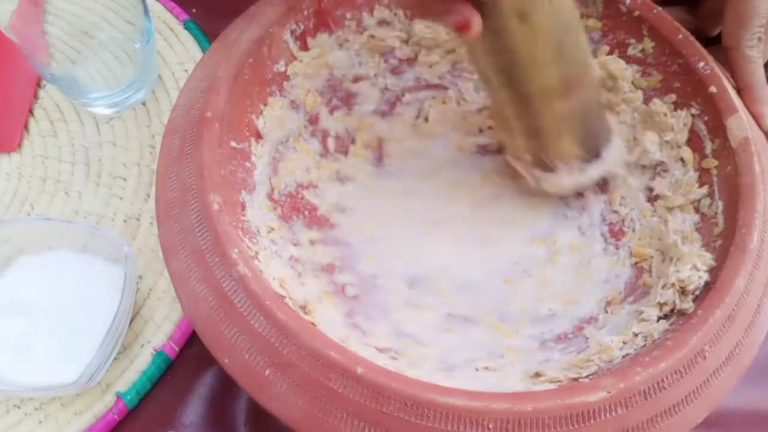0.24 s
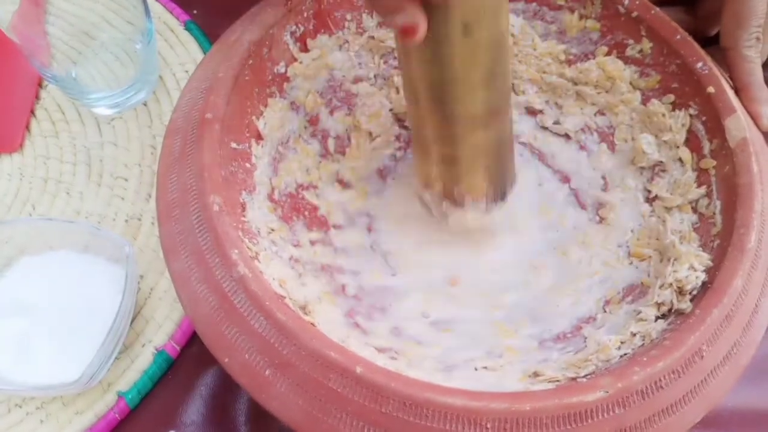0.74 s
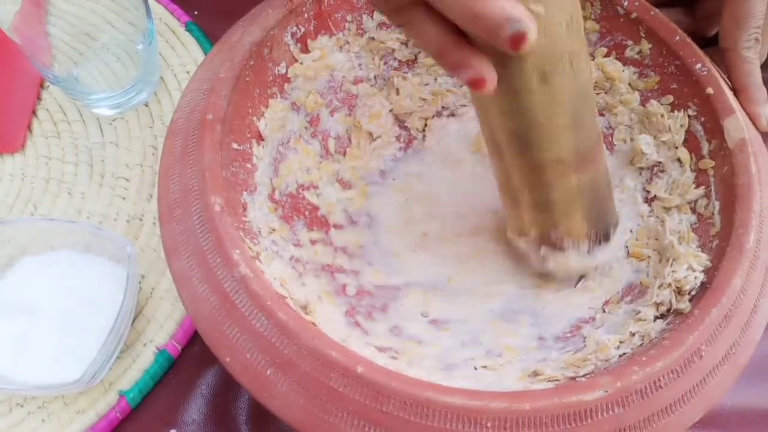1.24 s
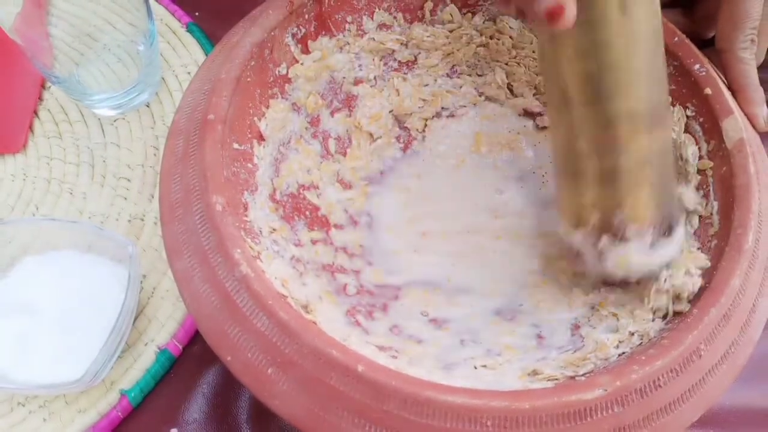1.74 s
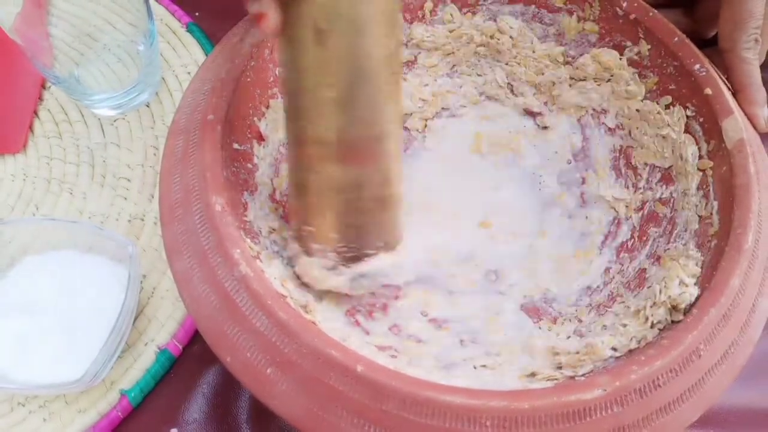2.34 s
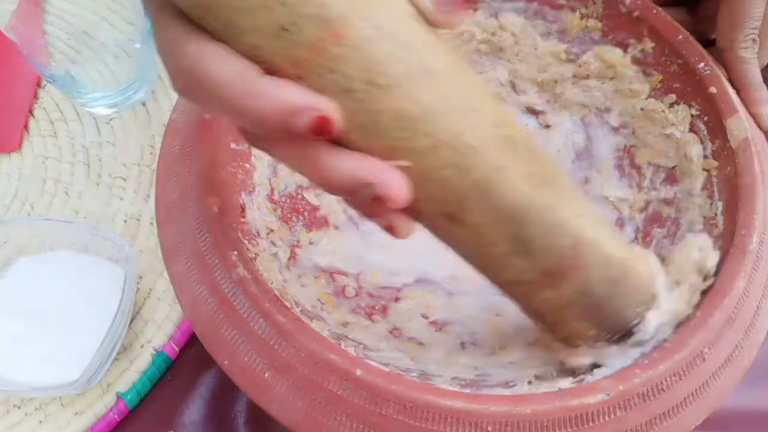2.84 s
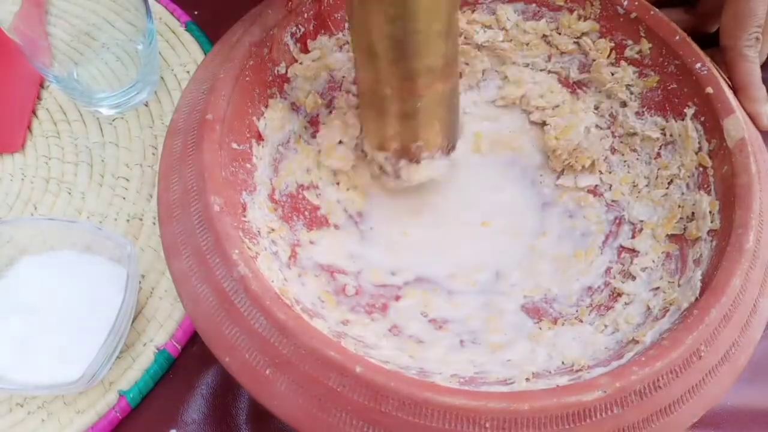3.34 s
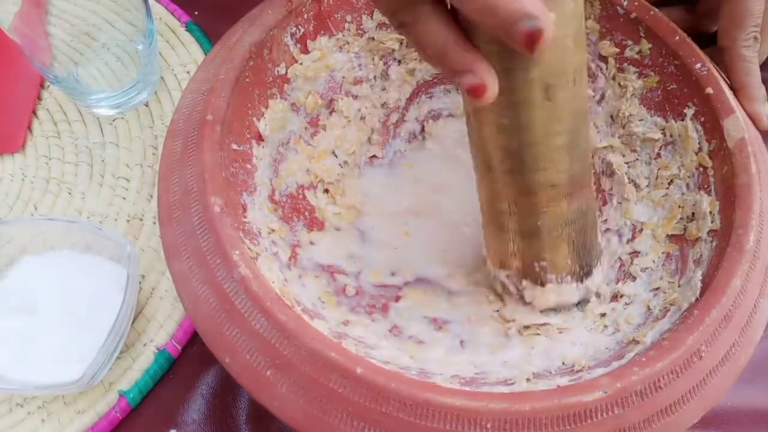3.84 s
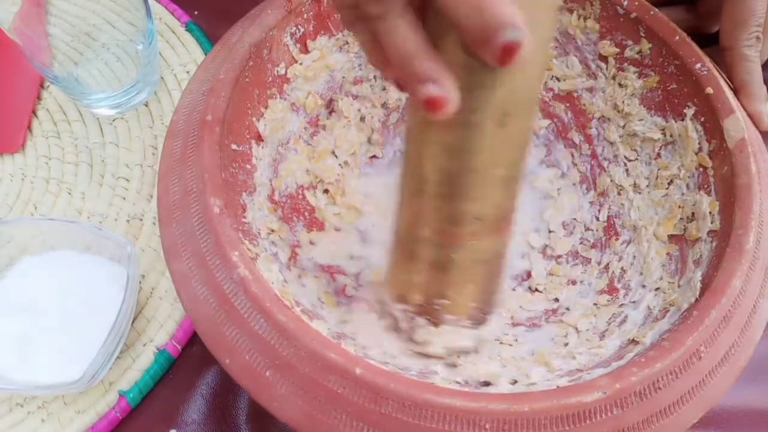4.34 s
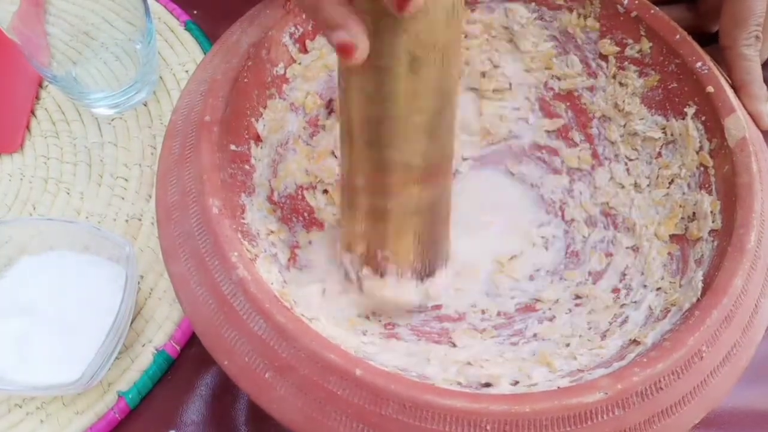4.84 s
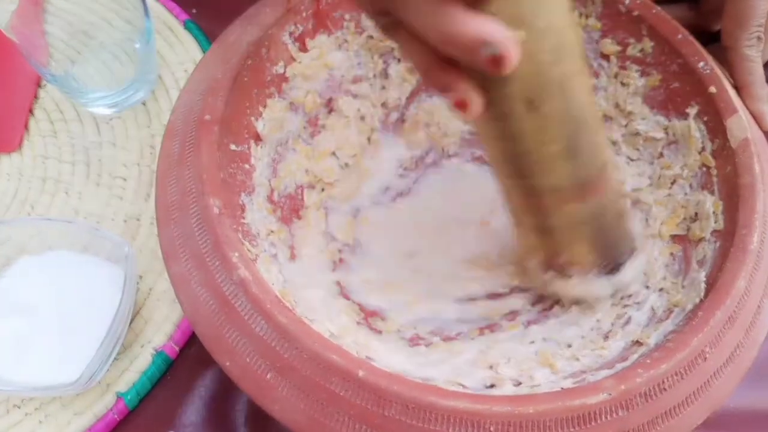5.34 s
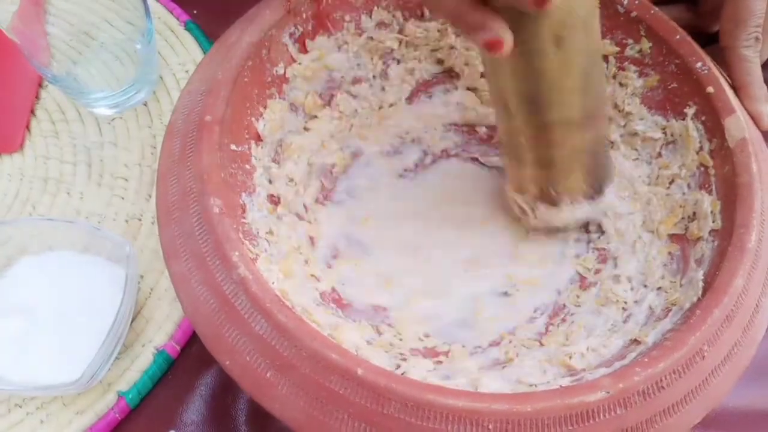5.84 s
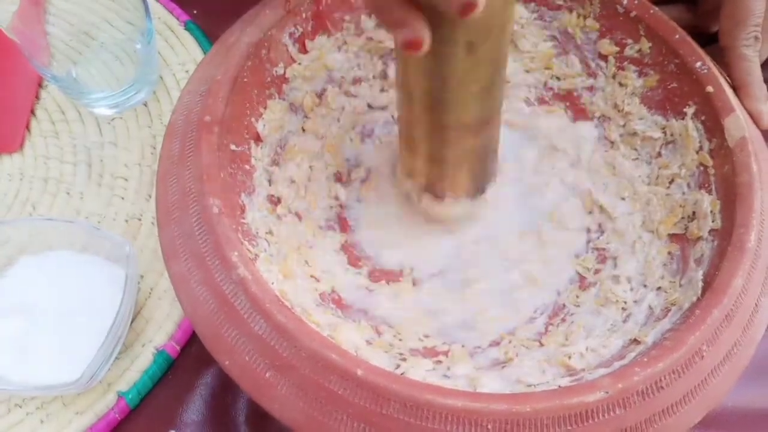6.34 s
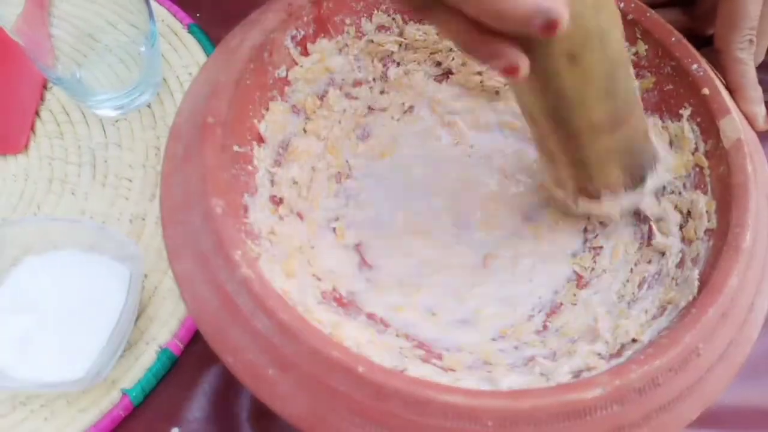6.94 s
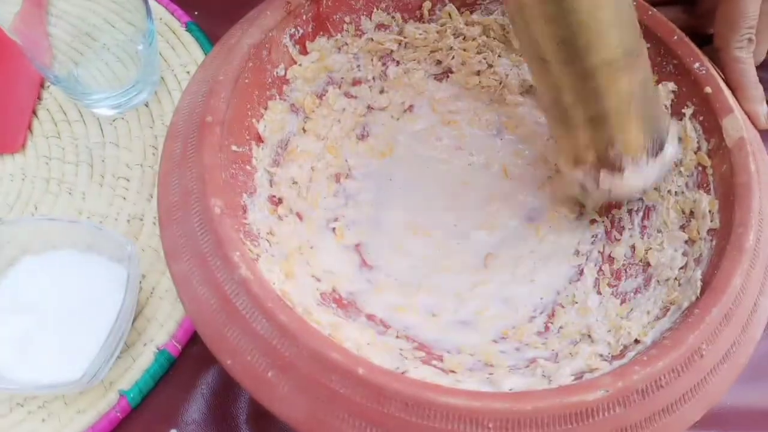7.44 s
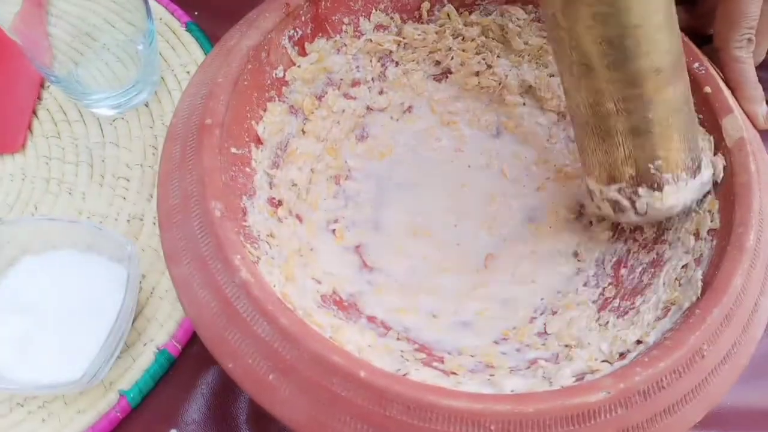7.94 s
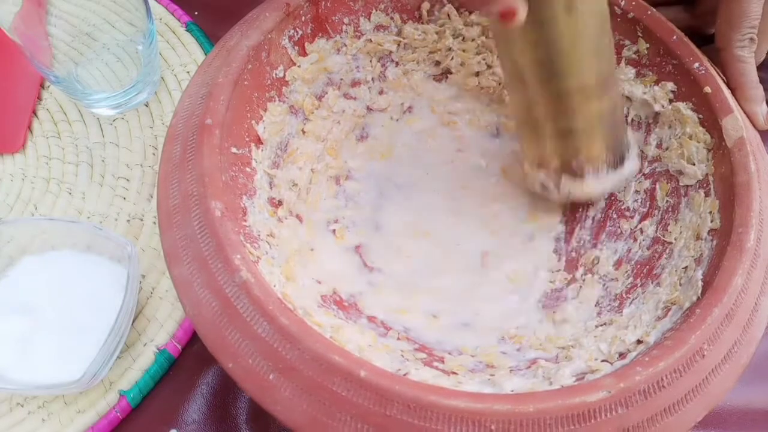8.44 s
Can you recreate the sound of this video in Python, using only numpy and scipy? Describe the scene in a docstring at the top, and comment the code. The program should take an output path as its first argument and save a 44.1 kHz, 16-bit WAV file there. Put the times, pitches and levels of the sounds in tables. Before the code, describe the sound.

Wet, grainy scraping in a clay bowl: brisk bright rasps with a faint hollow clay ring and soft table thuds, then a short lull of slower, smoother rubbing, then vigorous grinding again, crunchier and louder, with sharp seed cracks and a few solid pestle knocks. Mono, very close phone microphone, dry small kitchen with faint rumble.

```python
"""Pestle grinding wet seeds in a clay mortar

Quick strokes close to a phone in a quiet kitchen. Grit noise rasps and rings the wall, body, table and rim;
the rim rings on when the stroke runs up the wall. Bumps and knocks are soft pushes into body and table modes.
Seeds split as short filtered noise bursts, fragments crunch as decaying sine grains, sticky paste ticks faintly.
"""
import sys
import numpy as np
from scipy import signal
from scipy.fft import rfft, irfft, next_fast_len
from scipy.io import wavfile
from scipy.ndimage import uniform_filter1d, map_coordinates

SR = 44100
rng = np.random.default_rng(int(sys.argv[2]) if len(sys.argv) > 2 else 0)


def store_wav(level_fs):
    """Save 16-bit WAV to argv[1]."""
    pcm = np.round(np.clip(np.atleast_2d(level_fs), -1, 1) * 32767)
    wavfile.write(sys.argv[1], SR, pcm.T.astype(np.int16))


N = 382788

# pestle knocks: start_s, ring_peak_db, thud_db (table thud peak against ring peak)
KNOCK_EVENTS = [(0.276, -23, -5.5), (0.291, -27, -7), (0.383, -19.5, -10), (0.488, -31, -3),
                (0.635, -19, -9), (0.669, -26.5, -5), (0.805, -26.5, -18), (0.826, -17.5, -13),
                (1.154, -23, -9), (1.177, -30.5, -3), (1.614, -32, -18), (1.687, -34.5, 13),
                (1.78, -26, -23), (1.923, -25.5, -19), (3.585, -46.5, 17), (4.02, -34.5, -12),
                (4.102, -51, 5), (4.436, -42, 1), (4.447, -26.5, -24), (4.457, -27, -20), (4.548, -25.5, 1),
                (4.643, -30.5, 1), (4.804, -22, -15), (4.925, -30.5, -2), (5.029, -8, -16),
                (5.04, -25.5, 0.5), (5.179, -27, 2), (5.204, -25, -15), (5.316, -24, -20), (5.38, -28, -14),
                (5.616, -34, -23), (5.891, -26.5, -15), (5.996, -26, -16), (6.017, -22, -0.5),
                (6.029, -15.5, -7), (6.049, -20.5, -24), (6.227, -43, -8), (6.423, -26, -3),
                (6.569, -28.5, 0), (6.878, -32, -1), (7.05, -33.5, 1), (7.171, -27.5, -6),
                (7.326, -28, -13), (7.344, -12.5, -22), (7.366, -30, -19), (7.44, -43, -18),
                (7.583, -30, -13), (7.593, -18, -26), (7.857, -30, -17), (7.871, -24, -31),
                (7.963, -22.5, -29), (8.088, -35, -18), (8.132, -30, -6), (8.42, -20, -11),
                (8.426, -9.5, -13), (8.439, -20, -22), (8.455, -16.5, -22), (8.567, -13.5, -14)]
# mortar body resonances: centre_hz, width_hz, level_db
BODY_MODES = [(497, 7.7, 1), (603.3, 110, 12.5), (726, 74, 13.5), (900.5, 60, 9), (1250, 40, -33)]
# table resonances: centre_hz, width_hz, level_db
TABLE_MODES = [(94.4, 66, -7.5), (152, 59, 0.5), (222, 32, -1.5), (270, 68, -9.5)]


def grinding():
    """Sliding contact drives wall, body, table and rim, each from its own scale of roughness."""
    # contact place, relative to the rubbing: time_s, low_rim_db, high_rim_db, wall_db, bright_db
    place = [(0.0, -10, -16, -19, -16), (0.3, -14.5, -16, 2.5, -10), (0.93, -11, -12.5, 1, -20),
             (1.3, -16, -14, -6, -8.5), (1.86, -2, -5.5, -13, -10.5), (2.1, -23, -27, -3.5, -13),
             (2.4, -17, -7.5, -4, -11), (3.3, -12, -18, -11.5, -10.5), (3.6, -17, -19, -12.5, -9),
             (4.3, -18, -18.5, -12, -9), (4.7, -25, -18.5, -6, -8.5), (5.5, -18, -12, -3.5, -8.5),
             (6.37, -20, -18.5, -2, -20), (6.75, -14.5, -13.5, -14, -9), (7.23, -5.5, -13, -8.5, -8),
             (7.85, -9, -2.5, -9.5, -6), (8.25, -7.5, -14, -8, -6), (8.68, -18, -5, 5, -2)]
    low_rim_db, high_rim_db, wall_db, bright_db = curves(place)
    rasp_db, bump_db, weight_db = strokes()
    # the paste grips and slips
    slip_db = rasp_db + 0.58 * wobble(40) + 1.91 * wobble(150)
    force = patchy(grit(3000, spread_db=2.5, smooth=1.07), depth_db=2.5)
    contact = rasp(force, slip_db - 2.5) + crunch(slip_db - 13, count=4000)
    contact += wall_ring(force, slip_db + wall_db - 19.0)
    contact += fizz(slip_db + bright_db + 3.0)
    contact += bumps(bump_db + 1 - lifted()) + table_weight(weight_db + 0.5)
    # the low rim mode answers bumps as well as rasp, the high one rasp alone
    low_feed_db = 0.5 * rasp_db + 0.5 * bump_db + low_rim_db - 2.5
    high_feed_db = rasp_db + high_rim_db - 5.0
    return contact + rim_ring([low_feed_db, high_feed_db])


def strokes():
    """Speed rises and falls along quarter sines; levels follow its powers, overlapping strokes add in power."""
    # strokes: fastest_s, rise_s, fall_s, rasp_db, bump_db, table_weight_db
    stroke_rows = [(0.0, 0.04, 0.11, -36, -47, -54.0), (0.136, 0.23, 0.081, -39, -44, -42),
                   (0.22, 0.1, 0.13, -38.5, -48.5, -45), (0.302, 0.1, 0.11, -44, -44.5, -38),
                   (0.411, 0.1, 0.067, -40.5, -38.5, -38.5), (0.519, 0.18, 0.12, -46, -46, -45.5),
                   (0.667, 0.18, 0.1, -44, -39.5, -39), (0.834, 0.12, 0.11, -45, -42, -49),
                   (1.016, 0.13, 0.11, -44.5, -45.5, -47), (1.177, 0.124, 0.149, -42.5, -47.5, -55),
                   (1.394, 0.19, 0.062, -35.5, -42, -41.5), (1.507, 0.1, 0.095, -37, -44.5, -55),
                   (1.658, 0.14, 0.099, -37, -42.5, -41.5), (1.788, 0.11, 0.094, -39, -38, -40),
                   (1.932, 0.11, 0.086, -33.5, -40.5, -41.5), (2.03, 0.072, 0.2, -49.5, -70, -60),
                   (2.25, 0.28, 0.45, -60.5, -79, -72.0), (2.549, 0.41, 0.26, -48, -58, -58),
                   (2.61, 0.089, 0.055, -48.5, -66, -66), (2.785, 0.19, 0.158, -42, -59.5, -65.0),
                   (2.937, 0.19, 0.18, -40.0, -56.5, -54.5), (3.11, 0.26, 0.2, -42.5, -54.5, -54.0),
                   (3.245, 0.27, 0.07, -45.5, -74, -63), (3.639, 0.21, 0.069, -33, -42, -44.0),
                   (3.848, 0.31, 0.16, -39, -51, -50), (4.081, 0.23, 0.095, -34.5, -43, -40.5),
                   (4.22, 0.2, 0.15, -42.5, -60.5, -69.0), (4.441, 0.15, 0.12, -34, -41.0, -37.5),
                   (4.555, 0.17, 0.108, -34.0, -46.5, -41), (4.698, 0.15, 0.15, -33.5, -39, -37),
                   (4.832, 0.11, 0.069, -36, -37, -35), (4.979, 0.33, 0.089, -35, -42, -46.5),
                   (5.039, 0.035, 0.22, -37, -38.5, -35.0), (5.205, 0.084, 0.11, -31.5, -37.0, -39),
                   (5.337, 0.19, 0.259, -35, -35.5, -37.5), (5.435, 0.074, 0.05, -37.5, -38, -58),
                   (5.676, 1, 0.16, -49, -75, -73), (5.748, 0.47, 0.19, -39, -41.5, -46),
                   (5.942, 0.23, 0.093, -39.0, -37, -35.5), (6.04, 0.086, 0.14, -38, -39, -37.5),
                   (6.155, 1, 0.21, -47.5, -54, -47.5), (6.245, 0.085, 0.12, -42.5, -41.5, -46),
                   (6.421, 0.13, 0.1, -43, -39, -39), (6.593, 0.21, 0.35, -35, -49.5, -49.5),
                   (6.841, 0.2, 0.13, -33.5, -48.5, -48), (7.063, 0.17, 0.081, -31.5, -41.5, -39.5),
                   (7.206, 0.12, 0.097, -32.5, -39.5, -43), (7.354, 0.122, 0.082, -32.5, -31.5, -35.5),
                   (7.46, 0.082, 0.12, -32.5, -35.5, -40), (7.629, 0.13, 0.042, -32, -35.5, -35),
                   (7.723, 0.13, 0.1, -36, -40.5, -44), (7.892, 0.17, 0.06, -39.5, -41, -42.5),
                   (7.979, 0.072, 0.087, -35.0, -36.5, -46), (8.126, 0.14, 0.084, -36, -37.5, -43),
                   (8.271, 0.12, 0.15, -39, -42.5, -42), (8.452, 0.13, 0.07, -35.5, -30.5, -32.5),
                   (8.562, 0.13, 0.25, -38, -34, -40.5)]
    # amplitude grows as speed to these powers: rasp, bumps, weight; doubled for power
    laws = 2 * np.array([[4.39], [6.44], [4.9]])
    t, power = np.arange(N) / SR, np.full((3, N), 1e-12)
    for peak_s, rise_s, fall_s, *db in stroke_rows:
        start, stop = (max(0, round(s * SR)) for s in (peak_s - rise_s, peak_s + fall_s))
        span = slice(start, stop)
        away = np.where(t[span] < peak_s, (peak_s - t[span]) / rise_s, (t[span] - peak_s) / fall_s)
        speed = np.cos(np.pi / 2 * np.clip(away, 0, 1))
        power[:, span] += amp(db)[:, None] ** 2 * speed ** laws
    return 10 * np.log10(power)


def rasp(force, level_db):
    """Grit under the pestle heard directly, as noise of a fixed colour."""
    # rasp spectrum: freq_hz, density_db_per_hz
    rasp_spectrum = [(300, -10.5), (1000, -20), (1400, -6.5), (2050, -17), (3300, -8), (4500, -3),
                     (8000, 0.5), (10000, -9), (12000, -61), (16500, -55)]
    return driven(force, level_db, colour(rasp_spectrum))


def crunch(level_db, count):
    """Seed fragments break as short pitched grains of many sizes."""
    length = 256  # samples
    when, pitch, size = rng.random(count), rng.standard_normal(count), rng.exponential(size=count)
    hz = np.clip(4200 * np.exp(0.35 * pitch), 2200, 12000)[:, None]
    t = np.arange(length) / SR
    strength = amp(4.2 * np.minimum(size, 4))[:, None]
    grains = strength * np.sin(2 * np.pi * hz * t) * np.exp(-hz * t / 3)
    at = (when * N).astype(int)[:, None] + np.arange(length)
    mix = np.bincount(at.ravel(), grains.ravel(), N + length)[:N]
    return amp(level_db) * unit(mix)


def wall_ring(force, level_db):
    """Clay wall modes, each fed more or less as the contact point travels."""
    # wall resonances: centre_hz, undamped_width_hz, level_db
    wall_modes = [(1187, 94, 5), (2364, 23.3, 10), (2810, 91, 3.5), (3023, 37, 7.5), (3680, 27, 5),
                  (4054, 55, 4), (4440, 52, 7), (4680, 20, -13), (5580, 50, 3), (6110, 40, -4),
                  (8420, 460, 5.5)]
    wet_width_hz, wander_db = 90, 3.5  # the paste damps every mode to at least this width
    out = np.zeros(N)
    for hz, width_hz, db in wall_modes:
        feed_db = level_db + db + wander_db * wobble(28)
        out += driven(force, feed_db, modes([(hz, max(width_hz, wet_width_hz), 0)]))
    return out


def fizz(level_db):
    """The finest grit, nearly all one size, gives a dry brightness."""
    # fizz spectrum: freq_hz, density_db_per_hz
    fizz_spectrum = [(6000, -21), (9500, -3), (11500, -9.5), (14000, -12), (15800, -8)]
    fine = patchy(grit(2500, spread_db=0.5, smooth=0.44), depth_db=3.5)
    return driven(fine, level_db, colour(fizz_spectrum))


def bumps(level_db):
    """The pestle bumps over lumps: sparse soft impacts ring the body."""
    lumps = grit(250, spread_db=3.5, smooth=0.62)
    return driven(lumps, level_db, lambda f: modes(BODY_MODES)(f) * soft(1200)(f))


def lifted():
    """dB lost by the bumps as the pestle skips off the clay just before a knock above -12 dB."""
    t, loss_db = np.arange(N) / SR, np.zeros(N)
    for start_s, db, _ in KNOCK_EVENTS:
        near = slice(max(0, round((start_s - 0.06) * SR)), round(start_s * SR))
        dip_db = 0.5 * (db + 12) * np.exp((t[near] - start_s) / 0.0093)
        loss_db[near] = np.maximum(loss_db[near], dip_db)
    return loss_db


def table_weight(level_db):
    """The weight of the stroke shakes the table modes through a very soft contact."""
    load = grit(120, spread_db=5.5, smooth=1.0)
    return driven(load, level_db, lambda f: modes(TABLE_MODES)(f) * soft(400)(f))


def rim_ring(feeds_db):
    """Two narrow rim modes share one rough shaking force and flare unevenly."""
    # rim resonances, low then high: centre_hz, width_hz, level_db
    rim_modes = [(713, 13, 5.7), (1799.4, 23, 5.94)]
    shake = grit(90, spread_db=2.0, smooth=0.64)
    out = np.zeros(N)
    for feed_db, (hz, width_hz, db) in zip(feeds_db, rim_modes):
        out += driven(shake, feed_db + db + 0.85 * wobble(14), modes([(hz, width_hz, 0)]))
    return out


def knocks():
    """Each knock is a short soft push; body modes ring at new strengths, with a table thud."""
    # pestle's own note in a knock: centre_hz, width_hz, level_db
    pestle_mode = [(625, 102, 5)]
    out, push = np.zeros(N + SR), np.zeros(SR // 4)
    push[0] = 1
    thud = filtered(push, lambda f: modes(TABLE_MODES)(f) * soft(350)(f))
    luck = rng.standard_normal((len(KNOCK_EVENTS), len(BODY_MODES)))
    for (start_s, db, thud_db), draws in zip(KNOCK_EVENTS, luck):
        body = [(hz, width_hz, level + 3 * z) for (hz, width_hz, level), z in zip(BODY_MODES, draws)]
        ring = filtered(push, lambda f: (1.1 * modes(body)(f) - modes(pestle_mode)(f)) * soft(1050)(f) ** 2)
        blow = ring / np.abs(ring).max() + amp(thud_db) * thud / np.abs(thud).max()
        out[round(start_s * SR):][:len(push)] += amp(db) * blow
    return out[:N]


def cracks():
    """A seed splits in a burst of a few milliseconds: a wide snap that leans on its own centre."""
    # seed cracks: start_s, level_db (before a common trim), centre_hz
    crack_events = [(0.006, -12.5, 3900), (0.1163, -18, 8400), (0.392, -20, 2480), (0.4065, -15.5, 8000),
                    (1.256, -22.5, 7750), (1.319, -19, 8480), (1.332, -15, 8100), (1.71, -12, 9800),
                    (1.918, -30, 8200), (1.9374, -5.5, 7440), (2.175, -23.5, 8850), (2.9125, -15.5, 8500),
                    (2.928, -15, 4400), (3.5727, -13, 7860), (3.7304, -19, 8200), (3.7803, -13.5, 8100),
                    (4.395, -16.5, 4670), (4.4214, -9.5, 8000), (4.679, -21, 8780), (4.796, -12, 8060),
                    (4.8335, -18, 6240), (4.8462, -8.5, 5900), (4.951, -32, 3070), (5.196, -12.5, 7600),
                    (5.2058, -12, 4060), (5.211, -10, 2450), (5.346, -22, 3060), (5.3847, -18, 3010),
                    (5.3947, -12.5, 8540), (5.4256, -17, 8300), (5.635, -18, 2390), (5.7606, -13.5, 8000),
                    (5.9097, -17, 8510), (6.0472, -11, 8500), (6.5993, -13, 7500), (6.655, -11.5, 6140),
                    (6.773, -14, 8640), (7.011, -14.5, 7800), (7.0653, -8.5, 7700), (7.151, -17, 8000),
                    (7.17, -15.5, 4800), (7.1975, -8.5, 7650), (7.294, -18, 4320), (7.43, -13.5, 8000),
                    (7.447, -13, 8200), (7.605, -17, 9580), (7.6307, -9, 7940), (7.678, -19.5, 8200),
                    (7.744, -13, 8800), (7.94, -24.5, 6700), (8.082, -20, 4500), (8.415, -13, 7240),
                    (8.437, -21, 8580), (8.4548, -6, 8300), (8.468, -13, 9300), (8.5125, -18, 7200),
                    (8.537, -11, 3460), (8.5503, -6.5, 6800), (8.56, -25, 9500)]
    trim_db = -5.5
    out, t = np.zeros(N + SR), np.arange(SR // 50) / SR
    envelope = amp(-60 * t / 0.014) * (1 - np.exp(-t / 0.0003))
    for start_s, db, hz in crack_events:
        centre, wide = modes([(hz, 0.16 * hz, 0)]), modes([(0.85 * hz, 0.9 * hz, -12)])
        burst = filtered(rng.standard_normal(len(t)) * envelope, lambda f: centre(f) + wide(f))
        out[round(start_s * SR):][:len(t)] += amp(db + trim_db) * burst / np.abs(burst).max()
    return out[:N]


def ticks():
    """Sticky paste pops faintly at a steady average rate, even while the pestle is nearly still."""
    return driven(grit(30, spread_db=6, smooth=0), -70, modes([(8500, 9000, 0)]))


def kitchen():
    """Faint room noise with a low rumble, its level wavering slightly."""
    # room spectrum: freq_hz, density_db_per_hz
    room_spectrum = [(15, -43), (25, -10), (110, 2.5), (175, -12.5), (529, -18.5), (605, -16), (693, -13),
                     (793, -20.5), (1520, -21.5), (15900, -36)]
    noise = unit(filtered(rng.standard_normal(N), colour(room_spectrum)))
    return amp(-59 + 1.9 * wobble(7.0)) * noise


def grit(rate_hz, spread_db, smooth):
    """Random tiny impacts with a long tail of sizes, over smooth sliding noise."""
    hit = rng.random(N) < rate_hz / SR
    tail = np.minimum(rng.exponential(size=N), 3.5)
    size = amp(spread_db * tail) * rng.standard_normal(N)
    return unit(hit * size) + smooth * rng.standard_normal(N)


def patchy(x, depth_db):
    """Random gain in patches of frequency and time: the paste changes under the pestle."""
    z = signal.stft(x, nperseg=256)[2]
    field = uniform_filter1d(rng.standard_normal(z.shape), size=7, axis=0)
    field = uniform_filter1d(field, size=9, axis=1)
    return signal.istft(z * amp(depth_db * unit(field)), nperseg=256)[1][:N]


def wobble(rate_hz):
    """A smooth random curve, rate_hz knots a second."""
    knots = rng.standard_normal(int(N * rate_hz / SR) + 4)
    return map_coordinates(knots, [np.arange(N) * rate_hz / SR])


def curves(rows):
    """One value per sample for each column after the time."""
    time_s, *cols = np.transpose(rows)
    return [np.interp(np.arange(N) / SR, time_s, c) for c in cols]


def driven(force, level_db, response):
    """A force of changing strength rings through a response scaled to mean power gain 1."""
    power = np.mean(np.abs(response(np.linspace(1, SR / 2, 20000))) ** 2)
    return filtered(unit(force) * amp(level_db), response) / np.sqrt(power)


def modes(table):
    """Causal response of a set of resonances, alternating in sign."""
    def response(f):
        total = 0
        for k, (hz, width_hz, db) in enumerate(table):
            damping = 1j * f * width_hz
            total = total + (-1) ** k * amp(db) * damping / (hz * hz - f * f + damping)
        return total
    return response


def soft(hz):
    """A soft contact passes little above hz."""
    return lambda f: 1 / (1 + 1j * f / hz) ** 2


def colour(points):
    """Gain against frequency from (Hz, dB) points on a log axis."""
    f, db = np.transpose(points)
    return lambda hz: amp(np.interp(np.log(hz + 1), np.log(f + 1), db))


def filtered(x, response):
    """x through a complex response of frequency, by zero-padded FFT."""
    m = next_fast_len(len(x) + SR // 2)
    return irfft(rfft(x, m) * response(np.fft.rfftfreq(m, 1 / SR)), m)[:len(x)]


def amp(db):
    """Gain of a level in dB."""
    return 10 ** (np.asarray(db) / 20)


def unit(x):
    """x at rms 1."""
    return x / np.sqrt(np.mean(x ** 2) + 1e-20)


def scene():
    """Everything at the one microphone."""
    return (grinding() + knocks() + cracks() + ticks() + kitchen())[None]


def record(dry):
    """The phone's microphone loses the deepest bass and keeps nothing above its band limit."""
    low_cut_hz, top_hz = 45, 15950
    mic = lambda f: (f < top_hz) * (1j * f / low_cut_hz) ** 2 * soft(low_cut_hz)(f)
    return filtered(dry[0], mic)[None]


dry = scene()
out = record(dry)
store_wav(out)
```